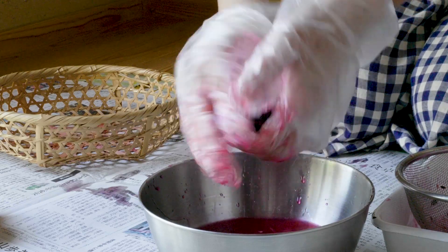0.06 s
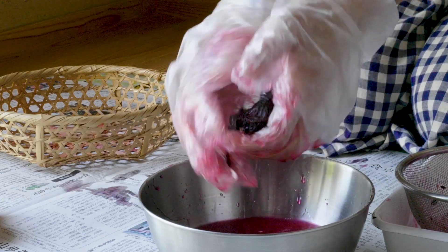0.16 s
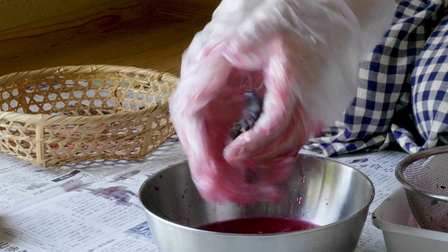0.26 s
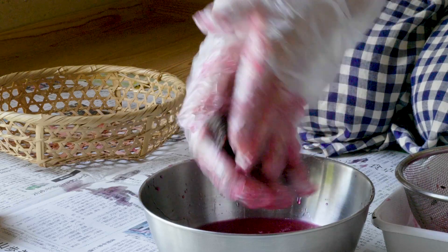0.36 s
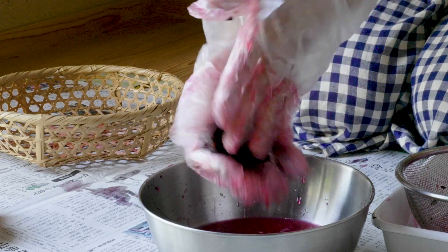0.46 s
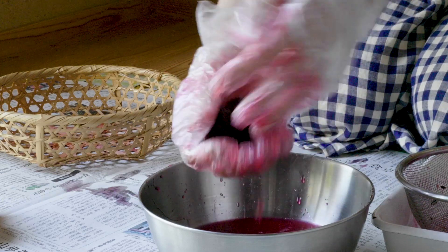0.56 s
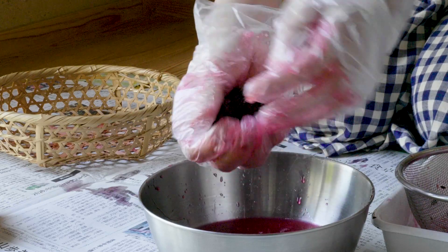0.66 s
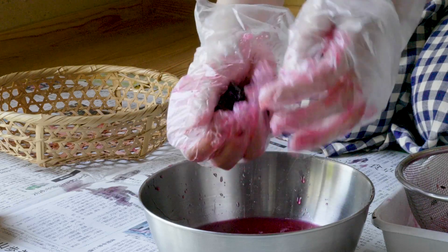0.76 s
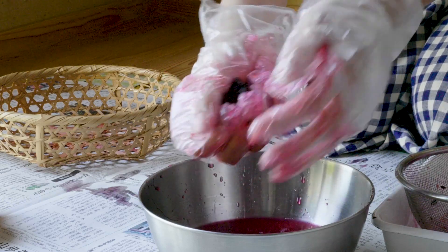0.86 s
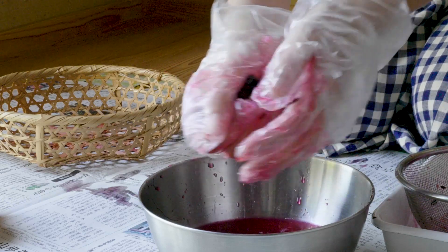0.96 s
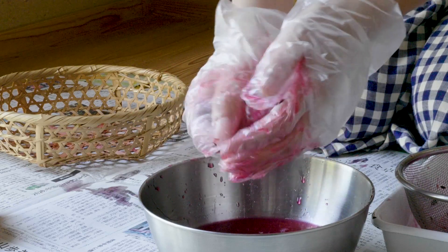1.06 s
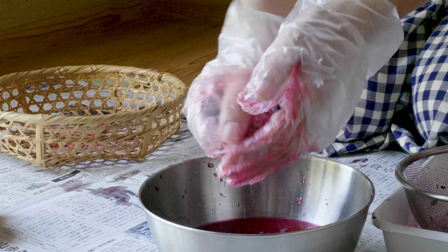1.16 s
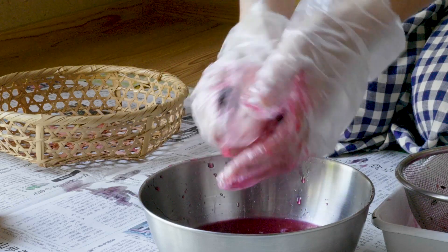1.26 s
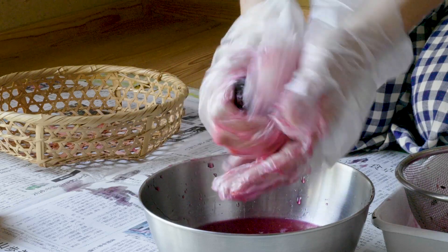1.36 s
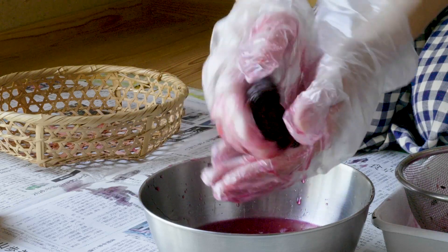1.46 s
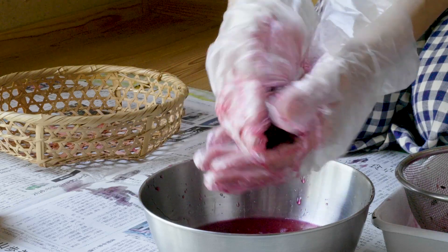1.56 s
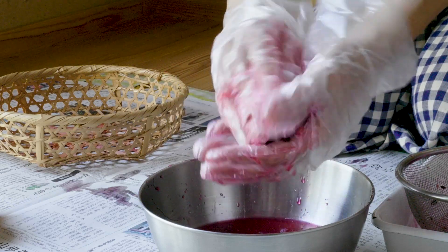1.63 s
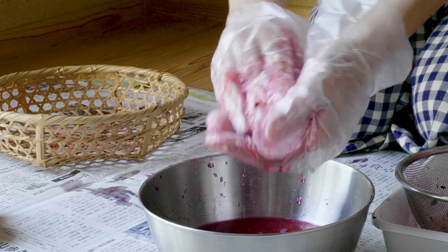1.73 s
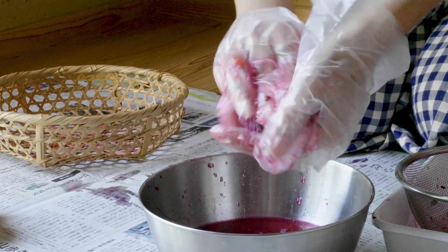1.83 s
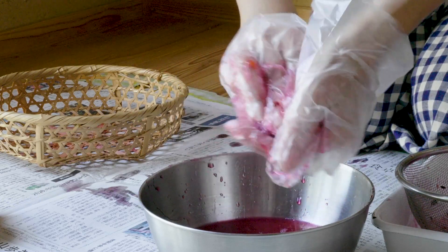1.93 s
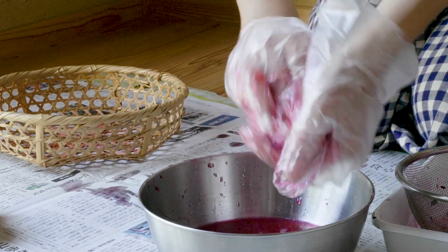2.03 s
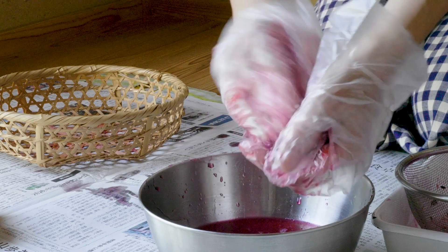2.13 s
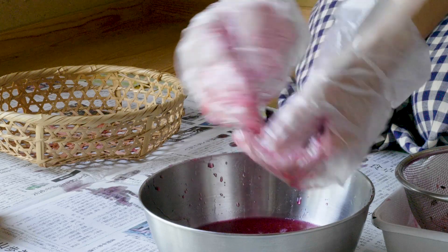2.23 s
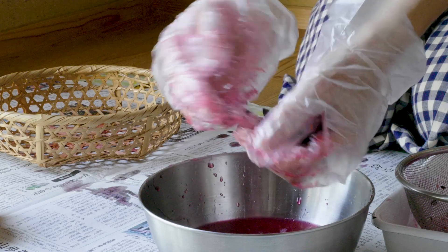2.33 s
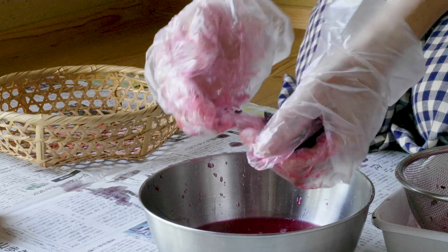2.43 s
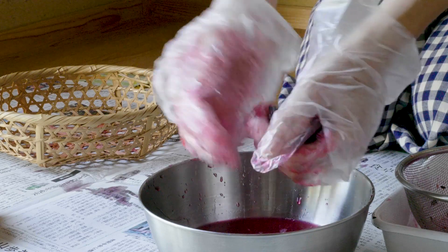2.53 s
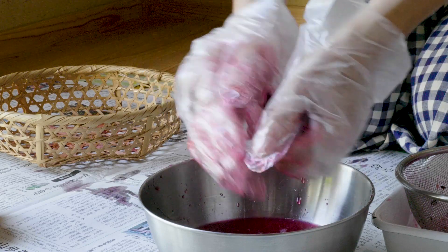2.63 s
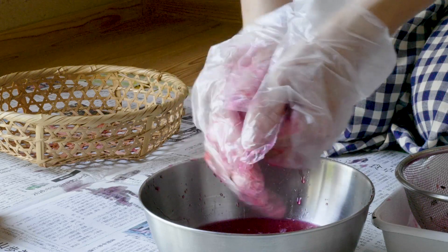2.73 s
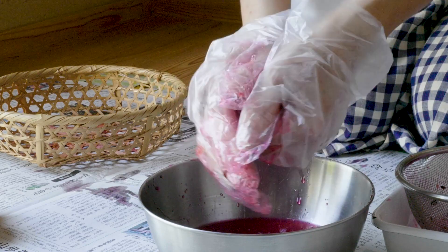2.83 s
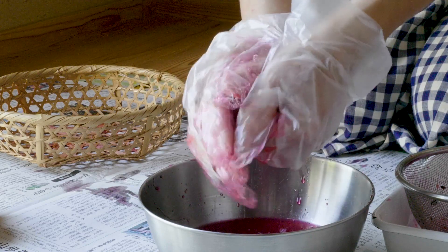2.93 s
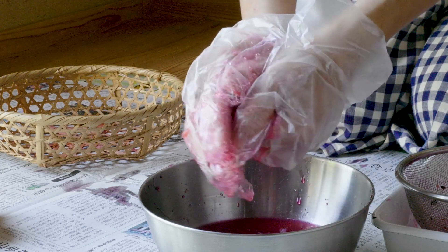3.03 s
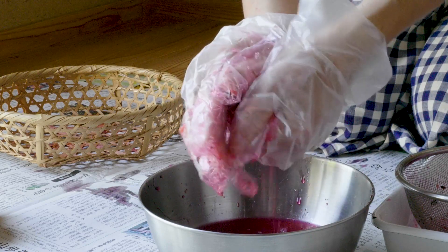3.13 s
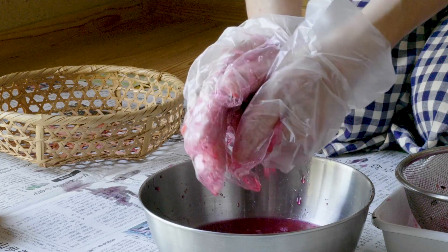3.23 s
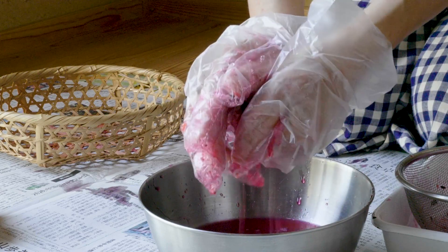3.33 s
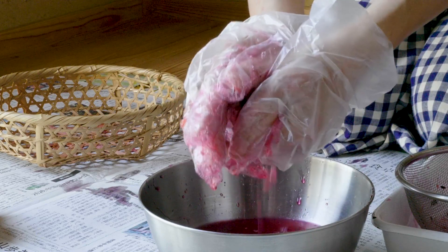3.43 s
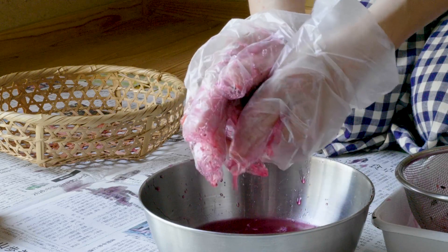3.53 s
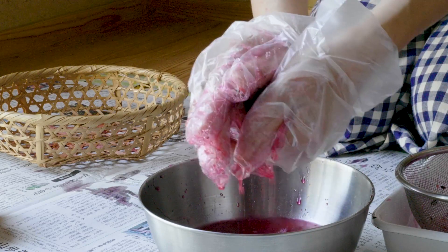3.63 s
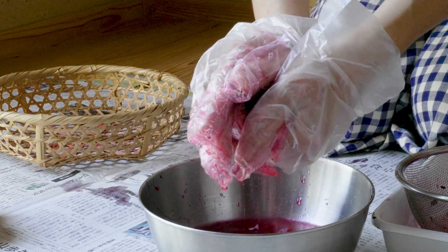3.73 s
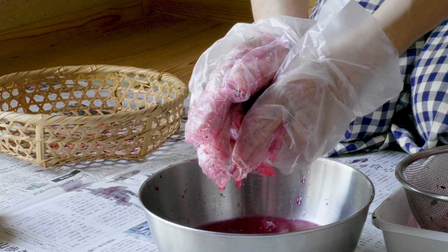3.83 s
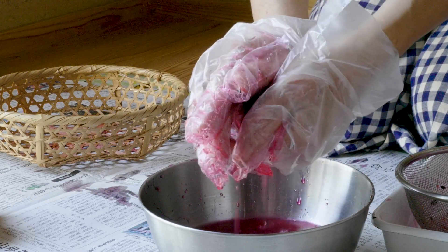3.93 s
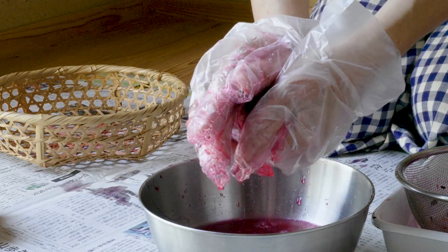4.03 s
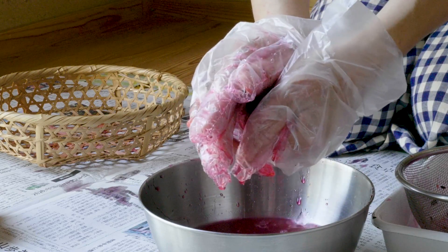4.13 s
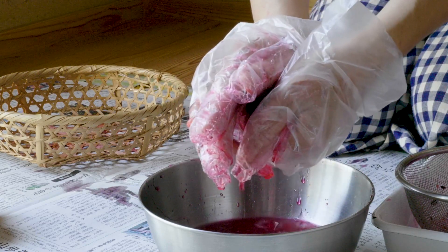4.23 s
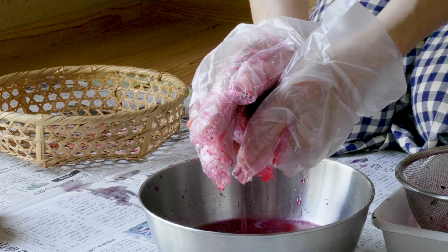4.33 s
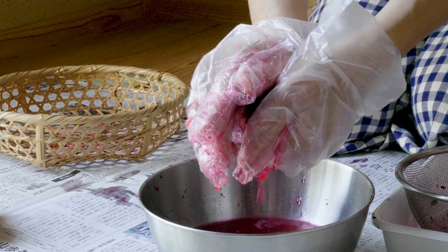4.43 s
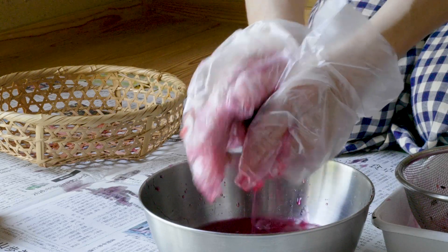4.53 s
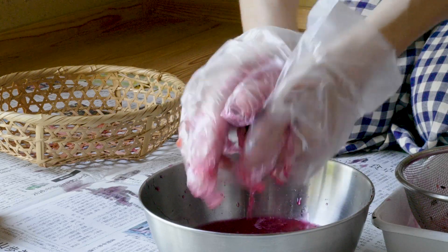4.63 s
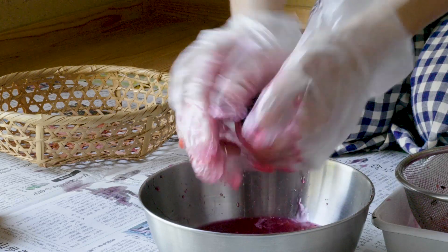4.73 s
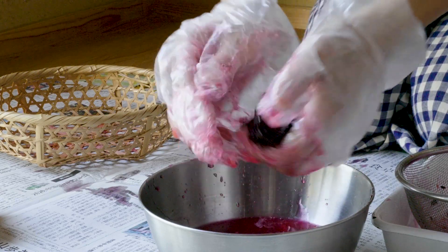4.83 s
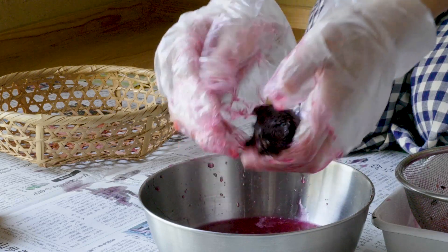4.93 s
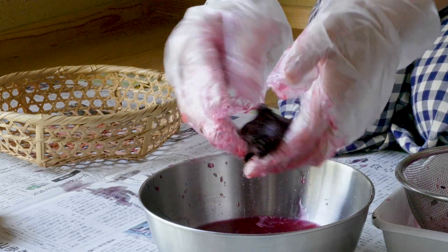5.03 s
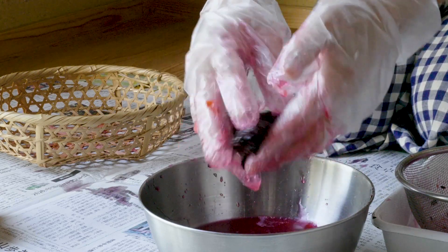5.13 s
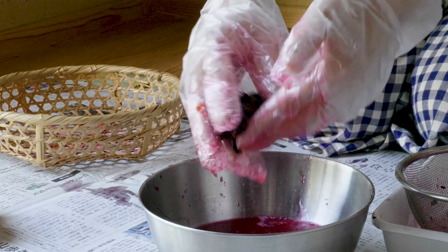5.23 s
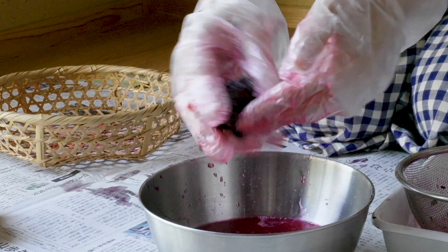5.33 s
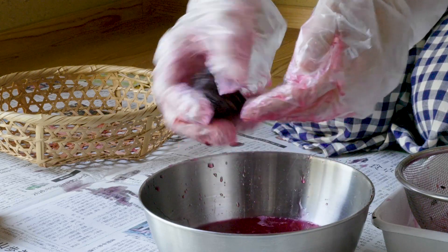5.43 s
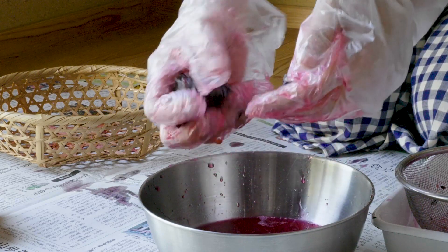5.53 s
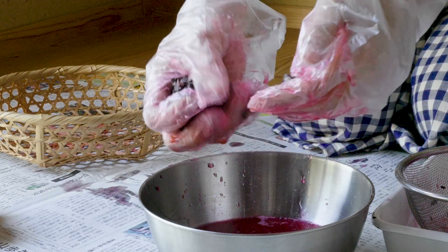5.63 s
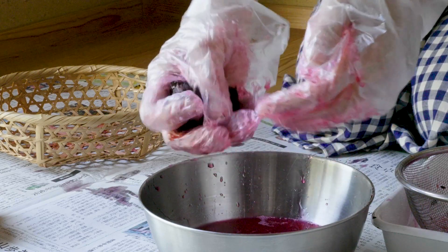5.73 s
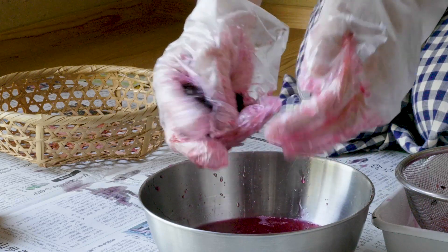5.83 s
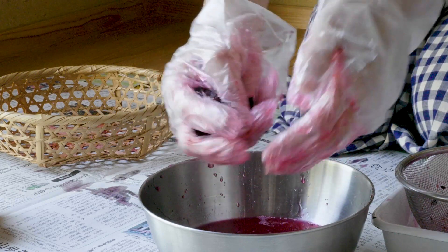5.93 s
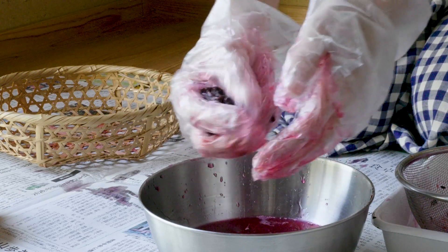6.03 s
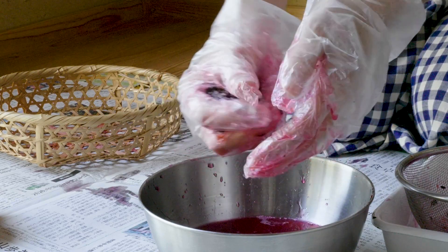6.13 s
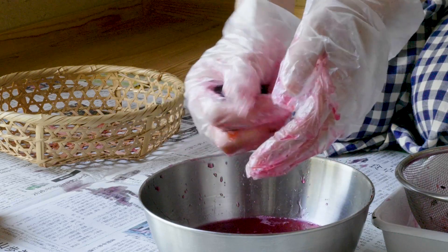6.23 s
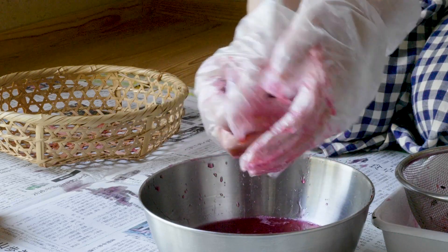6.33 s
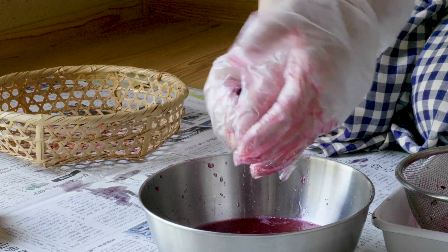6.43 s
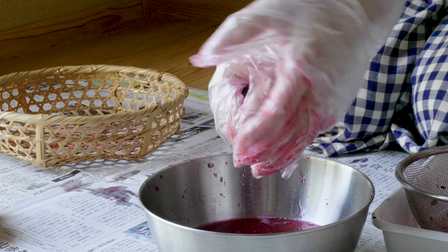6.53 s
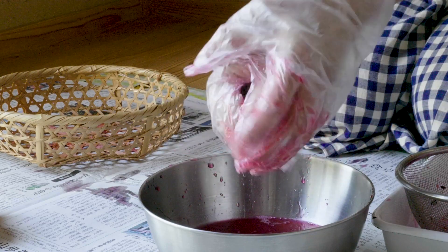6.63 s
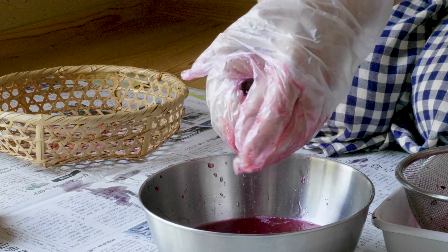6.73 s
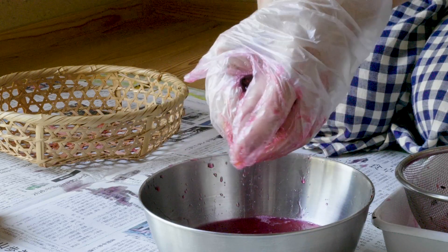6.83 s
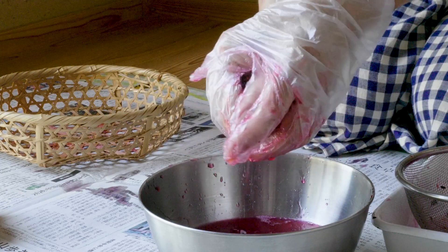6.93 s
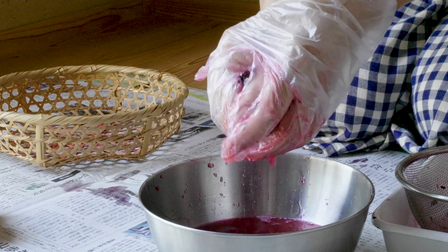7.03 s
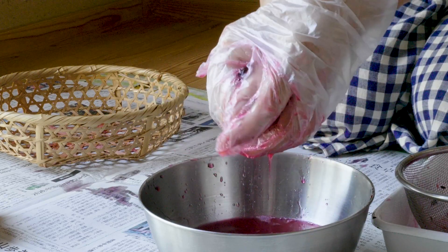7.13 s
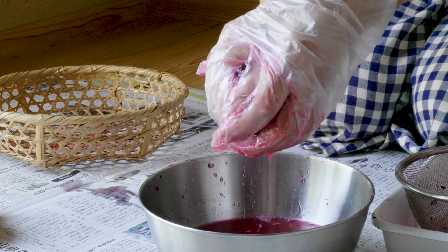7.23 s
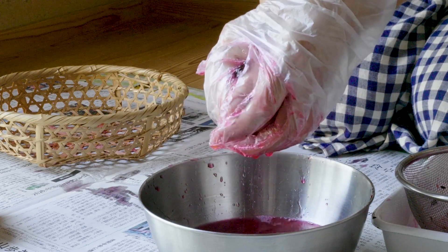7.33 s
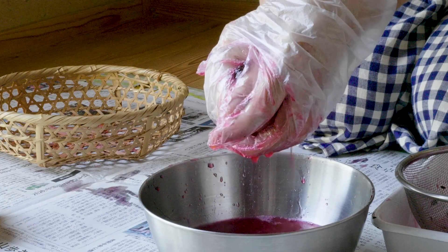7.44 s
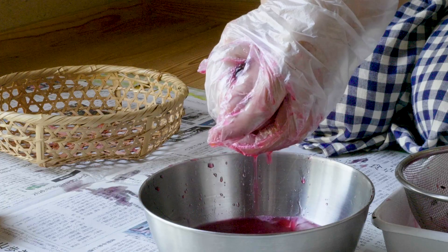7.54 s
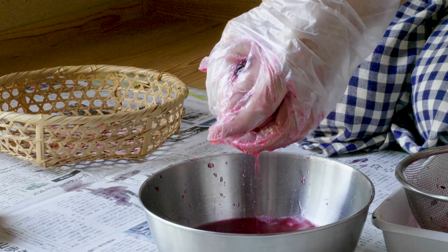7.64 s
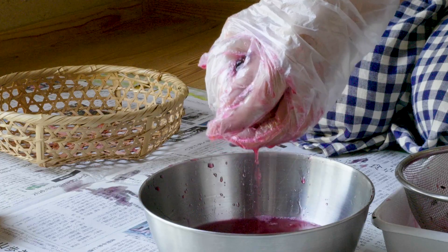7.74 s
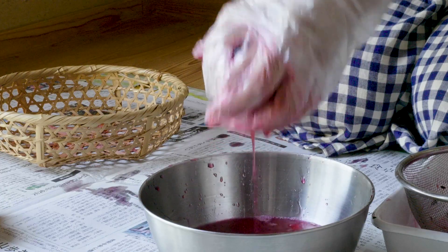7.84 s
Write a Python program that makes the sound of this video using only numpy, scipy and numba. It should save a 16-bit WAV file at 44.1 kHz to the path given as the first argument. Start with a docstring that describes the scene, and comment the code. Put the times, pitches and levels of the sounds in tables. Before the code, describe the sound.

Thin plastic gloves crackle immediately, bright and dry on top with duller, wet folding beneath, as hands knead leaves over a steel bowl about a metre away. From 0 to 2.3 seconds the strokes come thick and uneven, with sharp snaps near 0.4, 1.4 and 2.2; another snap pops at 2.5. Rustling thins after 3 seconds into a nearly still squeeze. Between 3.6 and 4.35, small juice drops plop with quick falling tones, clearest near 4.0. At about 4.75 a soft wet palm smack restarts busy crinkling, with a very bright snap at 5.5 and dense strokes until about 7. Then only slight film shifts remain, with faint drips at 7.7 and 7.8. Throughout, a high insect chorus hisses evenly outside over soft air and low, wavering distant traffic. The room adds short, faint echoes.

```python
"""Film snaps crisply at once: hands in thin plastic gloves knead and wring wet leaves over a steel bowl,
a metre from a stereo microphone, while an insect chorus hisses steadily outside and far traffic rumbles.
Creases are dense showers of coloured clicks with single ringing snaps on top; drops of juice plop into
the bowl as short falling tones. Chorus, air and traffic are coloured noise; the room adds short echoes."""
import sys
import numpy as np
from scipy import signal
from scipy.fft import rfft, irfft, next_fast_len
from scipy.io import wavfile
from scipy.ndimage import uniform_filter1d
from numba import njit

SR = 44100
rng = np.random.default_rng(int(sys.argv[2]) if len(sys.argv) > 2 else 0)


def gain_from_db(level_db):
    """Turn a decibel level (scalar or array-like) into a linear amplitude factor."""
    decades = np.asarray(level_db, float) / 20
    return 10 ** decades


def master(y):
    """Save y as 16-bit WAV."""
    cut = np.clip(np.atleast_2d(y).T, -1, 1)
    pcm = np.round(cut * 32767)  # scale
    wavfile.write(sys.argv[1], SR, pcm.astype(np.int16))


N = 347508
M = next_fast_len(N)
HZ = np.fft.rfftfreq(M, 1 / SR) + 1  # one hertz up, so that the log axis never meets zero
T = np.arange(N) / SR


def unit(x):
    """Scale to rms 1."""
    return x / np.sqrt(np.mean(x ** 2))


def along(table):
    """Read a table over frequency on a log axis, at every bin."""
    hz, value = np.transpose(table)
    return np.interp(np.log(HZ), np.log(hz), value)


def colour(x, db):
    """Causal filter with the given gain per frequency (minimum phase from the cepstrum)."""
    cepstrum = irfft(np.log(gain_from_db(db)), M)
    cepstrum[1:M // 2] *= 2
    cepstrum[M // 2:] = 0
    response = np.exp(rfft(cepstrum))
    return irfft(rfft(x, M) * response, M)[:N]


def hiss(db):
    """Noise of the given colour, rms 1."""
    white = rng.standard_normal(M)
    return unit(irfft(rfft(white) * gain_from_db(db), M)[:N])


def walk(rate):
    """Random levels held 1 / rate seconds and slewed twice; spread near 1."""
    hold = int(SR / rate)
    steps = np.repeat(rng.standard_normal(N // hold + 1), hold)
    slewed = uniform_filter1d(uniform_filter1d(steps, hold), hold)
    return 1.3 * slewed[:N]  # makes up for the spread lost in slewing


@njit
def rings(start, hz, t60, size, sharp, settle, rise, n):
    """Damped sines with a soft start; the pitch may begin sharp and settle (start, settle, rise in samples)."""
    out = np.zeros(n)
    for k in range(len(start)):
        length = t60[k] * SR
        phase, gain = 0., size[k]
        for i in range(int(start[k]) + 1, min(n, int(start[k] + length))):
            bend = 1 + sharp * np.exp((start[k] - i) / settle)
            phase += 2 * np.pi * hz[k] / SR * bend
            gain *= 1 - np.log(1000) / length
            onset = 1 - np.exp((start[k] - i) / rise)
            out[i] += gain * onset * np.sin(phase)
    return out


# slow sway of the low and high chorus bands, waver of the traffic drone
SWAY = walk(3.7), walk(3.46), walk(9)

# Colour of the insect chorus outside. Each row: frequency in Hz, relative level per Hz in dB.
CHORUS_COLOUR = [(2000, -46.5), (2900, -30), (3700, 2.5), (4600, 12), (5400, 14.5), (7000, 11), (8400, 11),
                 (9500, 0.5), (11000, -26), (15800, -60)]


def chorus():
    """Countless insect clicks blur into a hiss whose low and high bands sway apart."""
    level_db, tilt_db_per_octave, pivot_hz = -30, 6, 6800
    tilt_db = tilt_db_per_octave * np.log2(HZ / pivot_hz)
    low = hiss(along(CHORUS_COLOUR) - tilt_db)
    high = hiss(along(CHORUS_COLOUR) + tilt_db)
    swaying = low * gain_from_db(-6.5 + 0.2 * SWAY[0]) + high * gain_from_db(0.4 * SWAY[1])
    return gain_from_db(level_db) * unit(swaying)


# Colour of the room air and the distant town. Each row: frequency in Hz, relative level per Hz in dB.
AIR_COLOUR = [(12, -24), (22, 1), (42, -1), (55, -10.5), (105, -13.5), (150, -13.5), (300, -8), (500, -2.5),
              (760, -7.5), (1100, -12.5), (1750, -19), (2000, -16), (3000, -18), (6000, -21.5)]


def air():
    """Steady noise: air in the room and the blurred far traffic."""
    level_db = -49.5
    return gain_from_db(level_db) * hiss(along(AIR_COLOUR))


# Colour of the far traffic drone. Each row: frequency in Hz, relative level per Hz in dB.
DRONE_COLOUR = [(60, -60), (105, -30), (125, -8), (150, -2), (178, 0), (230, -4), (270, -11.5),
                (400, -33.5)]
# Swell of that drone at the microphone. Each row: time in seconds, level in dB before its waver.
DRONE_SWELL = [(0.0, -55.5), (1.21, -52), (1.51, -59.5), (1.62, -48), (1.76, -58.5), (1.8, -52.5),
               (3.01, -53), (3.03, -49.5), (3.8, -54), (4.45, -43), (4.56, -47.5), (5.31, -47), (5.36, -51),
               (6.3, -56.5), (6.36, -46.5), (6.54, -56.5), (7.53, -47), (7.88, -56)]


def traffic():
    """Far traffic: a narrow low band of noise that swells, sinks and wavers."""
    s, db = np.transpose(DRONE_SWELL)
    return gain_from_db(np.interp(T, s, db) + 1.5 * SWAY[2]) * hiss(along(DRONE_COLOUR))


def outdoors():
    """One draw of everything far away; all draws share the same swells and sways."""
    return chorus() + air() + traffic()


def room(x):
    """Kitchen walls: decaying noise tails; moving hands hand the sound from one echo pattern to the next."""
    t60_s = .2
    s = np.arange(int(t60_s * SR)) / SR
    tails = rng.standard_normal((4, len(s))) * gain_from_db(-60 * s / t60_s)
    tails /= np.sqrt(np.sum(tails[0] ** 2))
    share = np.array([walk(5) for _ in tails])
    share /= np.sqrt(np.sum(share ** 2, axis=0))  # the shares keep a constant total power
    return signal.fftconvolve(x * share, tails, axes=1).sum(axis=0)[:N]


# Drops falling into the juice, close by. Each row: start in seconds, level in dB before the soft start,
# settled pitch in Hz, time to decay by 60 dB in seconds.
JUICE_DROPS = [(3.623, -36, 2070, 0.026), (3.765, -37, 2000, 0.032), (3.881, -30, 2670, 0.013),
               (3.9005, -28, 2360, 0.041), (3.9749, -13.5, 1950, 0.015), (3.985, -22, 1950, 0.02),
               (4.095, -31, 3180, .04), (4.1314, -43, 1170, 0.02), (4.2666, -34, 2500, 0.017),
               (4.31, -41, 1410, 0.03), (4.333, -36, 1080, 0.066), (7.669, -43, 1500, .05),
               (7.832, -42, 1900, 0.028)]


def drops():
    """Each drop opens a small cavity in the juice: its pitch falls as the cavity deepens."""
    at, db, hz, t60 = np.transpose(JUICE_DROPS)
    sharp, settle_s, rise_s = 0.47, 0.00076, 0.00034  # sharp: extra share of the pitch at the start
    return rings(at * SR, hz, t60, gain_from_db(db), sharp, settle_s * SR, rise_s * SR, N)


# Ringing of bowl and table under the hands. Each row: centre in Hz, width in Hz, boost in dB.
BOWL_MODES = [(488, 56, 3), (860, 52, 5), (1320, 36, 2.5), (1950, 140, 2), (2552, 125, 4.5), (3134, 175, 5),
              (3480, 65, 3.5)]


def bowl_ring():
    """Gain in dB per frequency: each resonance of bowl and table is one smooth bump."""
    return sum(db / (1 + (2 * (HZ - hz) / width) ** 2) for hz, width, db in BOWL_MODES)


# Strokes of the hands, a metre off. Each row: crest in seconds, rise and fall in seconds per 10 dB,
# level in dB before the layer's gain, coarse minus fine buckles in dB, palms pressed in dB.
HAND_STROKES = [(.08, .3, 0.17, -36, 2, 0.5), (0.173, 0.064, 0.066, -34.5, 5.5, -2),
                (.47, 0.2, 0.051, -33, 0, 2), (0.497, 0.02, .08, -34, 5.5, 0),
                (.658, 0.14, 0.11, -34.5, -2, 3.5), (.755, 0.027, .05, -35.5, 7, -4),
                (.795, .04, 0.12, -39, 2.5, 0), (.958, .06, 0.054, -44.5, -2, -2),
                (1.134, 0.073, .08, -37.5, 2, 3.5), (1.259, 0.027, 0.059, -39.5, 3, -7),
                (1.35, 0.037, 0.066, -40.5, 0, -0.5), (1.479, .04, 0.16, -29.5, 5, -0.5),
                (1.58, .12, 0.069, -33, 7.5, 4.5), (1.67, .05, 0.13, -32, 2.5, 4.5),
                (1.762, 0.086, 0.027, -38, 1, 2), (1.836, 0.024, .08, -40, -2, -3),
                (1.939, 0.073, 0.13, -35.5, -1, -0.5), (2.215, 0.052, 0.052, -38, -2.5, 1.5),
                (2.25, 0.062, .05, -35, 0.5, 4.5), (2.286, 0.086, 0.032, -34, 0, 0),
                (2.375, 0.033, 0.033, -43, 2.5, 2.5), (2.634, 0.05, 0.056, -40, 0.5, 3),
                (2.762, 0.053, 0.096, -43, -6, 2.5), (2.832, 0.089, 0.083, -32.5, -0.5, 3),
                (2.942, .04, .07, -42, 2.5, 2), (3.074, 0.075, 0.044, -40.5, -4.5, 2),
                (3.156, 0.044, 0.054, -46, -3, 1), (3.246, 0.05, .06, -40, -1.5, 1.5),
                (3.37, .1, .08, -48.5, -5, -4), (3.632, 0.16, 0.13, -46.5, -7, 6),
                (4.03, 0.17, 0.018, -49, 1.5, -0.5), (4.148, .1, 0.087, -51.5, -3, 9),
                (4.5, 0.21, 0.19, -49, -3, 3), (4.658, 0.028, 0.19, -39.5, -3, -3),
                (4.762, .015, 0.047, -36, 7.5, 3.5), (4.81, 0.045, 0.079, -31, 4.5, -1.5),
                (4.974, .05, 0.045, -44, -5, 9), (5.172, 0.042, 0.091, -33, -3.5, -2.5),
                (5.32, 0.07, 0.063, -35.5, -2, -0.5), (5.49, 0.064, .1, -40.5, -2.5, 3),
                (5.562, 0.076, 0.055, -35, 5, -3.5), (5.601, 0.079, 0.026, -30.5, 3, -4),
                (5.69, 0.11, 0.12, -37.5, 4, -8), (5.775, 0.037, 0.058, -35, 3.5, -7),
                (5.91, 0.11, 0.086, -36, -6, -3), (6.14, 0.094, 0.055, -34, -2, -1.5),
                (6.214, .05, .04, -38, 1.5, 1.5), (6.28, .04, 0.11, -39.5, 4.5, -7),
                (6.358, 0.016, 0.047, -36.5, 1, -7), (6.43, .06, .08, -47, -2, 9.5),
                (6.54, .12, 0.27, -36.5, 4.5, 0), (6.684, 0.18, 0.12, -37, 0, 0.5),
                (6.77, 0.09, .07, -31, -1.5, -6), (6.847, 0.056, 0.066, -39.5, 6.5, -1.5),
                (6.91, 0.055, 0.11, -34, -2.5, -4.5), (7.194, .15, 0.028, -46.5, -1.5, -1),
                (7.358, .12, 0.1, -47, -5, -3)]
# Small shifts of the grip between strokes, nearly still while a squeeze is held. Each row: time in seconds,
# level in dB before the layer's gain, coarse minus fine buckles in dB.
GRIP_SHIFTS = [(0, -50.5, -1), (2.3, -45, -0.5), (3.3, -49, -1.5), (3.45, -57.5, -5), (4.55, -58.5, -10),
               (4.7, -48.5, -3.5), (7.05, -51, -4), (7.25, -54, -2.5), (7.88, -57, -11)]


def effort(gain_db, coarse, pressed=0):
    """Level in dB of one buckle size: strokes over the grip; coarse, pressed weigh the tilt and palm columns."""
    t = T[::44]  # about every millisecond
    at, rise, fall, db, tilt_db, palm_db = np.transpose(HAND_STROKES)[:, :, None]
    before = (at - t) / np.maximum(rise, .005)
    after = (t - at) / np.maximum(fall, .005)
    distance = np.where(t < at, before, after)
    strokes_db = db + coarse * tilt_db + pressed * palm_db - 10 * distance
    s, db, tilt_db = np.transpose(GRIP_SHIFTS)
    grip_db = np.interp(t, s, db + coarse * tilt_db)
    power = np.sum(gain_from_db(2 * strokes_db), axis=0) + gain_from_db(2 * grip_db)
    return np.interp(T, t, gain_db + 10 * np.log10(power))


def shower(db, rate, spread_db, flurry_db, body_db):
    """Film buckling: clicks of uneven size, up to rate per second as the hands work harder, in flurries."""
    density = np.clip(rate * gain_from_db(db - db.max()) ** .5 / SR, 1e-4, 1)
    chance = rng.random((3, N))
    # exponential sizes, capped: no crease is larger than a finger
    size_db = spread_db * np.minimum(-np.log(1 - chance[1]), 3.5)
    polarity = np.sign(chance[2] - .5)
    clicks = (chance[0] < density) * gain_from_db(size_db) * polarity
    clicks = clicks / np.sqrt(density)  # sparse and dense stretches get the same mean power
    return gain_from_db(db + flurry_db * walk(60)) * unit(colour(clicks, body_db))


# Loudest single snaps of the film, close by. Each row: start in seconds, first crest in dB, pitch in Hz.
FILM_SNAPS = [(0.0558, -11, 4760), (0.4214, -7, 5600), (0.4883, -6, 5500), (0.9537, -22, 4860),
              (1.1288, -16, 7360), (1.2585, -11, 8500), (1.3997, -4, 7830), (1.455, -12, 4690),
              (1.481, -22, 4570), (1.8243, -18, 7650), (1.9385, -13.5, 8100), (2.2169, -7.5, 7800),
              (2.4414, -21, 5850), (2.458, -18, 6180), (2.4997, -3, 6650), (2.583, -14.5, 5440),
              (2.742, -11, 4900), (3.049, -18.5, 5650), (4.0647, -20, 6040), (4.6493, -13.5, 4920),
              (4.6593, -27, 8590), (4.7431, -18, 5250), (4.8, -22, 3160), (5.1463, -24, 5060),
              (5.1642, -23, 4510), (5.2031, -10, 5280), (5.3223, -15, 4250), (5.5089, -1, 8640),
              (5.5313, -15, 4420), (5.68, -22, 5700), (5.7658, -22, 3940), (5.876, -11.5, 6200),
              (6.0965, -16.5, 6030), (6.1337, -13.5, 4100), (6.3579, -13.5, 7850), (6.5999, -11, 7990),
              (6.667, -13, 5290), (6.7396, -14, 4820), (6.8843, -20, 4370), (6.8972, -16, 5000),
              (7.001, -19, 4990), (7.061, -16, 5770), (7.7518, -28.5, 5460), (7.863, -27, 5840)]
# Wet palms smacking together. Each row: start in seconds, first crest in dB, pitch in Hz.
PALM_PATS = [(2.319, -28, 900), (4.7603, -21, 1250), (4.7633, -14.5, 2000)]


def snaps():
    """Film snaps and palm smacks: short damped rings, each gone within a few cycles."""
    at, db, hz = np.vstack([FILM_SNAPS, PALM_PATS]).T
    cycles = 9.0  # to decay by 60 dB
    first_swing_db = 60 / 4 / cycles  # the decay before the first crest
    return rings(at * SR, hz, cycles / hz, gain_from_db(db + first_swing_db), 0., 1., .00002 * SR, N)


# Colours of the film, from broad buckles over the palms through folds and middling wrinkles to fine creases.
# Each row: frequency in Hz, relative level per Hz in dB.
PALM_COLOUR = [(150, -38.5), (480, -9.5), (700, -11), (1120, -15.5), (1230, -5.5), (1500, -4.5),
               (1700, -9.5), (2500, -15.5), (6000, -37.5)]
FOLD_COLOUR = [(800, -30), (1700, -12), (1850, -2.5), (2800, -3), (4000, -19.5), (8000, -31)]
WRINKLE_COLOUR = [(1500, -22), (2700, -10), (3300, -0.5), (5000, 1), (6500, -11.5), (9000, -17),
                  (15800, -25)]
CREASE_COLOUR = [(2000, -21), (4000, -1.5), (6500, -4.5), (8500, -1), (11000, -6.5), (14000, -11.5),
                 (15800, -28)]


def gloves():
    """From broad palms to fine creases, each size of buckle has its own colour; a few snaps stand out."""
    bowl_db = bowl_ring()
    palms_db = effort(gain_db=-8.5, coarse=.7, pressed=0.95)
    folds_db = effort(gain_db=-.5, coarse=.6)
    wrinkles_db = effort(gain_db=4, coarse=-0.12)
    creases_db = effort(gain_db=7.5, coarse=-.4)
    palms = shower(palms_db, 1800, 1.55, 0.85, along(PALM_COLOUR) + bowl_db)
    folds = shower(folds_db, 2500, 1.9, 1.0, along(FOLD_COLOUR) + bowl_db)
    wrinkles = shower(wrinkles_db, 4000, 2.4, 1.5, along(WRINKLE_COLOUR) + bowl_db)
    creases = shower(creases_db, 6000, 3.5, 1.23, along(CREASE_COLOUR))
    return palms + folds + wrinkles + creases + snaps()


# The microphone ports drift out of step in the top octave.
# Each row: frequency in Hz, lead of the left port in radians.
PHASE_LEAD = [(11000, 0.), (12100, 1.4), (13800, 1.5), (15600, 5.5)]


def pair(direct, diffuse, ports):
    """Left and right share the direct sound and get the diffuse sound with opposite signs."""
    side_db, balance_db = (along(p) for p in ports)
    apart = 1 / (1 + (70 / HZ) ** 4)  # the longest waves reach both ports alike
    mid = rfft(direct, M)
    side = rfft(diffuse, M) * gain_from_db(side_db) * apart
    tilt = gain_from_db(apart * balance_db / 2) * np.exp(.5j * along(PHASE_LEAD))  # half to each port
    left = irfft((mid + side) * tilt, M)[:N]
    right = irfft((mid - side) / tilt, M)[:N]
    return np.array([left, right])


# The stereo microphone towards the hands a metre off, and towards the far outdoors: two lists each.
# Each row of the first: frequency in Hz, side gain in dB; of the second: frequency in Hz, left minus right
# in dB. Both fade out in the lowest bass.
NEAR_PORTS = [(60, -15), (110, -12), (200, 1), (380, -17), (700, -9), (1290, -10), (2380, -11.5),
              (4400, -11), (8120, -12), (15000, -9.5)], [(60, -8), (110, 1), (200, -8), (380, 3.5),
              (700, -3), (1290, -1.0), (2380, -1.5), (4400, -1), (8120, 0.5), (15000, -5.5)]
FAR_PORTS = [(60, -29), (110, -40), (200, -6.5), (380, -6), (700, -14), (1290, -3.5), (2380, -4),
             (4400, -9), (8120, -9.5), (15000, -1)], [(60, 14), (110, 2.5), (200, 4), (380, 1.5), (700, 4),
             (1290, -1.5), (2380, 4), (4400, 2.5), (8120, 2.0), (15000, 8)]


def scene():
    """Hands and bowl close by with their room echo, the outdoors behind."""
    room_db = -9.5  # echo relative to the direct sound
    no_bass = signal.butter(4, 250, "high", fs=SR, output="sos")  # the near sound carries no deep bass
    near = signal.sosfilt(no_bass, gloves() + drops())
    direct = (near + gain_from_db(room_db) * room(near)) / np.sqrt(1 + gain_from_db(2 * room_db))
    hands = pair(direct, room(near), NEAR_PORTS)
    behind = pair(outdoors(), outdoors(), FAR_PORTS)
    return hands + behind


def roll_off(x):
    """The treble ends steeply here."""
    return signal.sosfilt(signal.butter(12, 15980, fs=SR, output="sos"), x)


def record(dry):
    """Store the finished stereo mix."""
    return roll_off(dry)


dry = scene()
out = record(dry)
master(out)
```